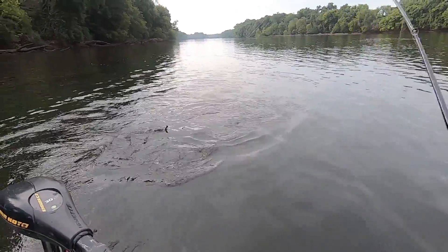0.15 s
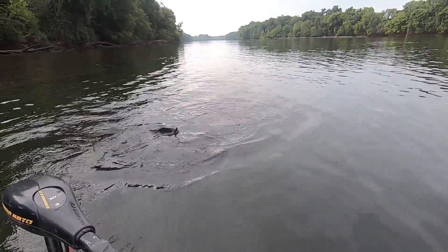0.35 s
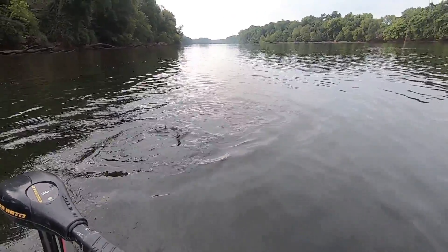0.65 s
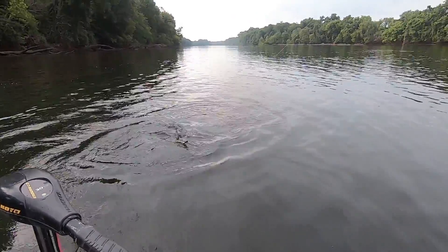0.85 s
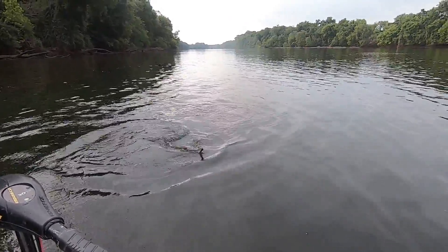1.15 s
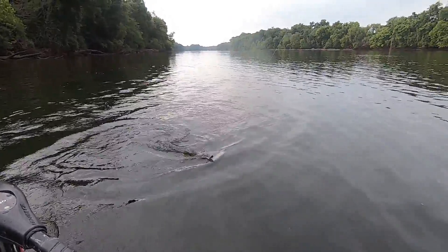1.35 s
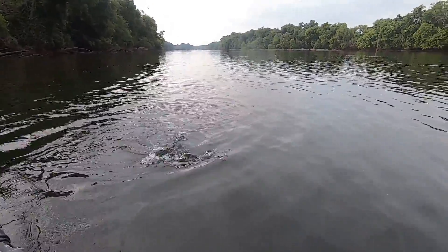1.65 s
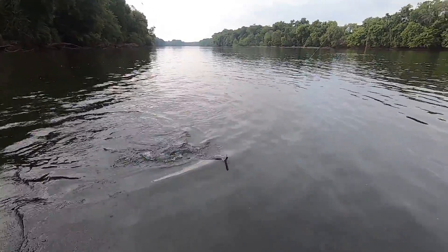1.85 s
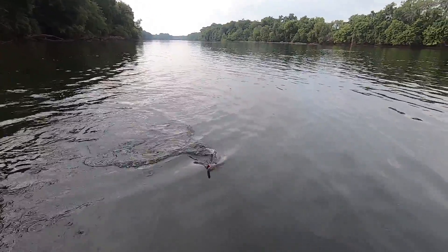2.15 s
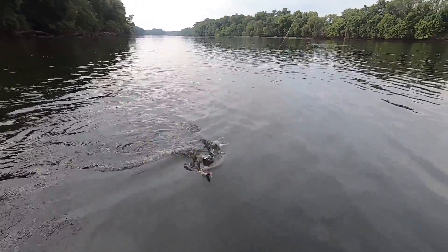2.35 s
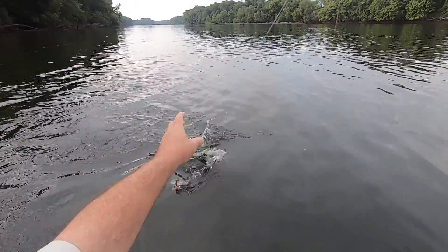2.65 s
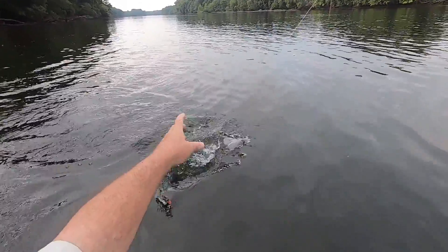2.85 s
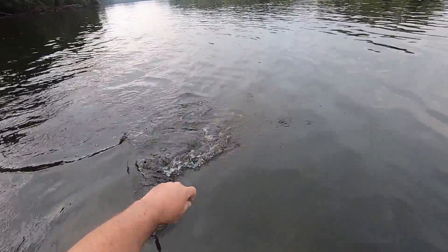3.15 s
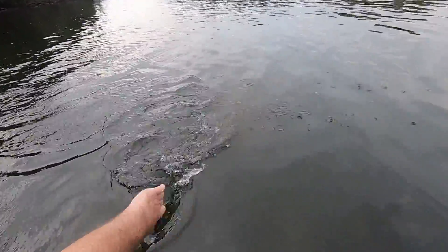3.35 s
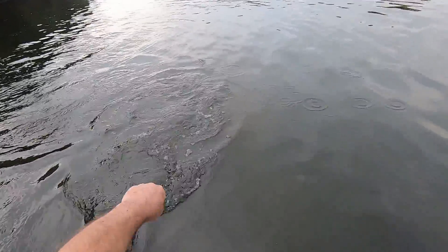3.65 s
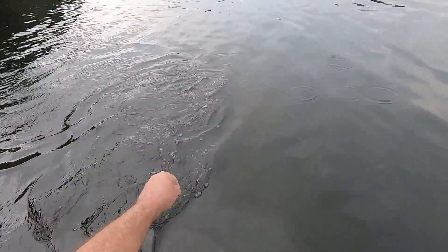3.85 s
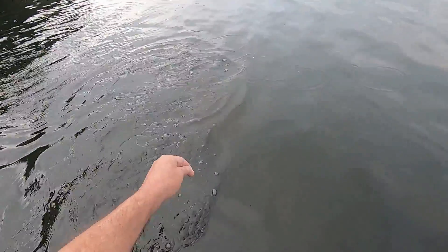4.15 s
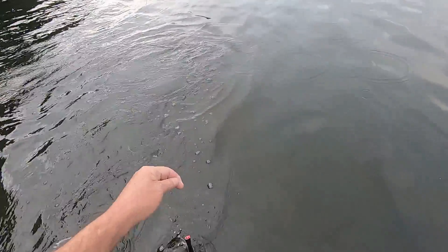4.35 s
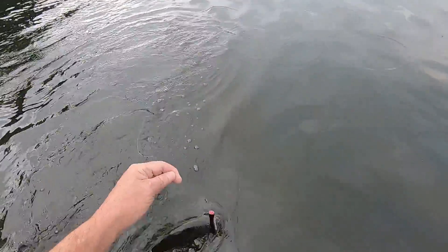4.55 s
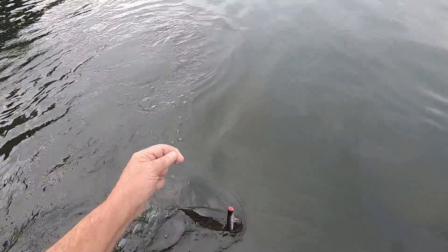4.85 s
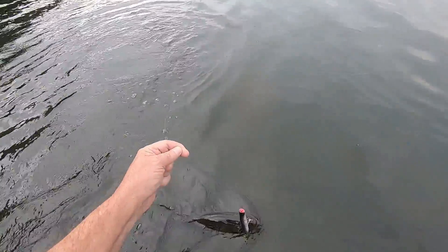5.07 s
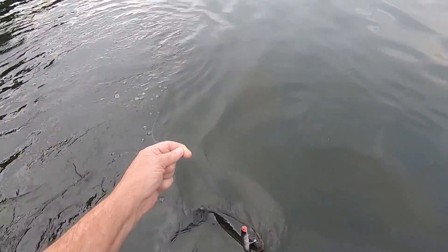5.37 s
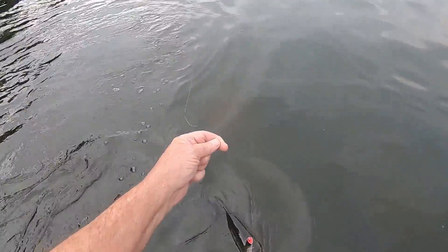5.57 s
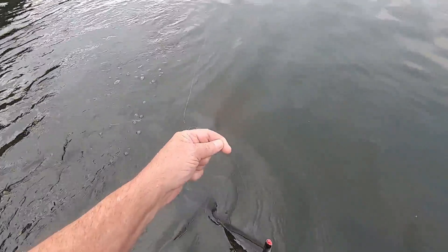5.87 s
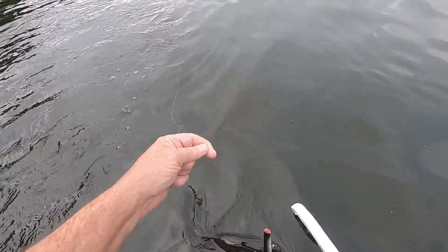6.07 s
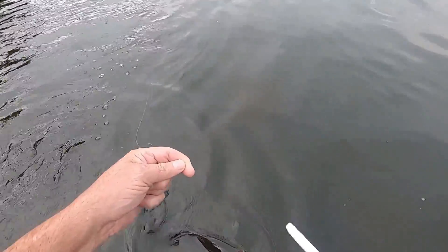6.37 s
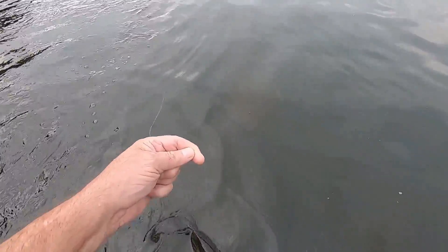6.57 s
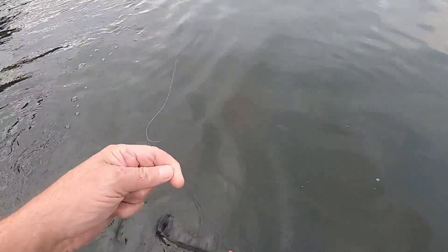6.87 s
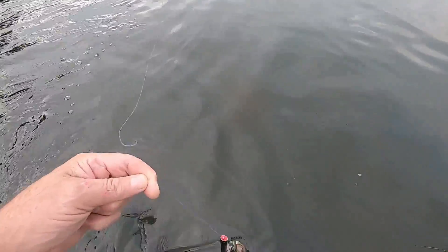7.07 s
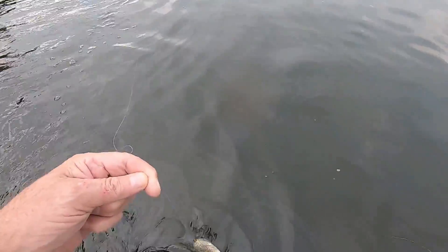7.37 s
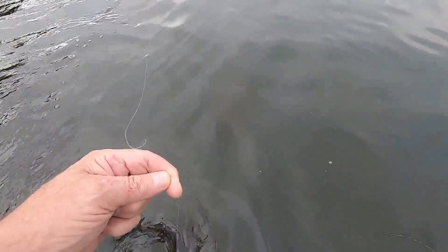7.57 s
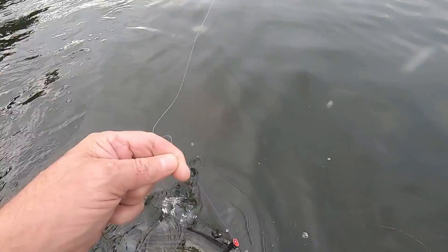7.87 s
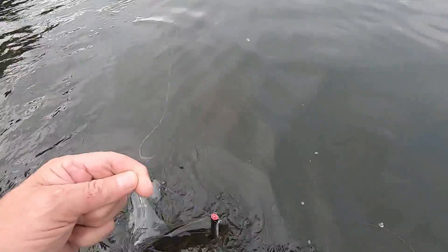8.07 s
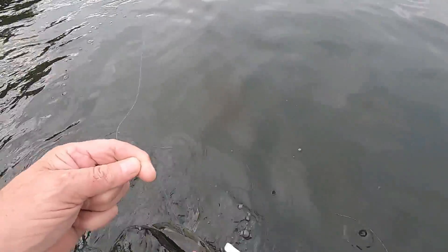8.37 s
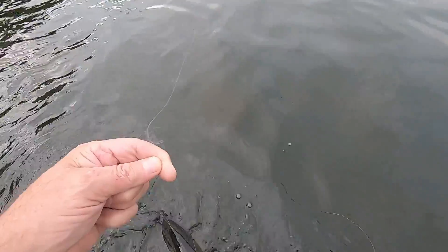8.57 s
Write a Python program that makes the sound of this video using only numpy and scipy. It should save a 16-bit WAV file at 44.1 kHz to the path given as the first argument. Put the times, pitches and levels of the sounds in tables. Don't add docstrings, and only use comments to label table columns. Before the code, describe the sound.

Over a steady low hum and soft roar, river water ticks, churns and plops; tackle bangs a plastic hull before one last sharp splash.

```python
import sys
import numpy as np
from scipy import signal
from scipy.fft import rfft, irfft, next_fast_len
from scipy.io import wavfile
from scipy.ndimage import uniform_filter1d

SR = 44100
rng = np.random.default_rng(int(sys.argv[2]) if len(sys.argv) > 2 else 0)


def digitize_waveform(pressure):
    field = np.atleast_2d(pressure).T
    bounded = np.clip(field, -1, 1)
    quanta = np.round(bounded * 32767).astype(np.int16)
    wavfile.write(sys.argv[1], SR, quanta)


def gain_from_db(level_db):
    decades = np.asarray(level_db, float) / 20
    return 10 ** decades


N = 384552

# time in seconds, carry of the hum in dB, roar in dB.
AIR = [(0, -21, -45.5), (0.799, -27, -45), (1.6, -25.5, -45.5), (2.4, -26.5, -45), (3.2, -24, -45),
       (3.901, -26, -45.5), (4.15, -36, -46.5), (4.5, -25, -45.5), (5.4, -23, -45), (5.8, -27, -49),
       (6.4, -25, -46.5), (6.8, -20, -46), (7.3, -25, -47.5), (7.9, -25.5, -47), (8.72, -23.5, -46.5)]
# frequency in Hz, density in dB per Hz.
ROAR_SPECTRUM = [(22, -28), (30, -6), (45, -4), (100, 2), (150, -4), (215, -5.5), (300, -13.5), (400, -15),
                 (700, -24.5), (1500, -30), (2600, -37), (4200, -49), (7000, -56), (9600, -62.5),
                 (11500, -83)]
# frequency in Hz, left-right likeness.
FAR_LIKENESS = [(40, 0.96), (120, 0.992), (260, 1.3), (530, 0.7), (1100, -0.11), (2290, 0.35), (4740, 0.08),
                (9820, -2.5)]
# frequency in Hz, left over right in dB.
PORT_BALANCE = [(60, 0), (110, -0.5), (190, -0.5), (330, -0.5), (580, -3), (1020, -7), (1800, -6.5),
                (3160, -4.5), (5570, -1), (9820, 0.5)]
# frequency in Hz, rms level in dB.
HUM_TONES = [(37.26, -34.2), (74.52, -33.8), (79.18, -43.9), (90.09, -30.3), (95.89, -29.3),
             (114.02, -43.8), (143.1, -43.1), (149.0, -45.0)]
# frequency in Hz, rms level in dB, waver in Hz, fade in dB per second.
WHINES = [(214.1, -43, 6, 0), (243.3, -47.5, 0.938, 0), (356, -49.5, 1.99, 0), (466.7, -49, 0.79, 0.33),
          (820.4, -55.5, 2.84, 0.5), (1702, -64.5, 12, 0)]
# time in seconds, frequency in Hz, level in dB.
BIRD_CALL = [
    (6.688, 2690, -62),
    (6.716, 2610, -53),
    (6.746, 2340, -53),
    (6.77, 2160, -63),
]
# frequency in Hz, level in dB, 60 dB decay time in seconds.
HULL_MODES = [(143, -14.5, 0.07), (204.4, 1, 0.093), (291, -4.5, 0.086), (388, -4, 0.063),
              (553, -4.5, 0.019), (990, -20, .03)]
# start in seconds, peak in dB, crack above the blow in dB,
# ping of the struck panel in Hz, ping above the blow in dB.
BLOWS = [
    (2.255, -20, -12, 817, -12),
    (5.387, -9.5, -18.5, 403, -9),
    (5.515, -12.5, -17.5, 486, -12),
    (5.531, -9, -14.5, 990, -12.5),
    (5.583, -7.5, -9.5, 770, -5),
    (5.591, -6.5, -10.5, 800, -3),
    (5.604, -18.5, -22, 514, -4),
    (6.002, -34.5, -31, 546, 4.5),
    (6.448, -27, -1, 1140, -3.5),
]
# time in seconds, level in dB, rasp above it in dB.
DRAG = [
    (5.32, -38, -25),
    (5.37, -32, -25),
    (5.41, -37, -15),
    (5.47, -28, -14.5),
    (5.52, -23, -9),
    (5.57, -27.5, -12.5),
    (5.62, -24, -18),
    (5.66, -34.5, -15),
    (5.7, -43, -22),
]
# frequency in Hz, level in dB.
SCRAPE_SPECTRUM = [(200, -0.5), (380, 0.5), (650, -2), (990, 8), (1400, -4)]
# frequency in Hz, level in dB.
CRACK_SPECTRUM = [(500, -10), (1200, 4.5), (2500, 1.5), (4500, -10.5), (8000, -14.5), (10500, -21),
                  (15500, -42.5)]
# start in seconds, peak in dB, frequency in Hz.
RATTLE = [(5.1085, -43.5, 8100), (5.3885, -26.5, 8300), (5.527, -37, 5300), (5.5828, -25, 9350),
          (5.592, -24.5, 8150), (6.0008, -41.5, 7600), (6.149, -34.5, 5740), (6.1903, -45, 5800),
          (6.226, -43.5, 5600), (6.404, -48, 4670), (6.4485, -29, 7650), (6.4495, -27.5, 5330),
          (6.097, -54, 5300), (6.183, -48, 5700), (6.201, -48, 5800), (5.377, -39, 9000),
          (6.003, -43, 9800), (5.256, -50, 7900), (6.6556, -47, 7700)]
# start in seconds, peak in dB, frequency in Hz.
TAPS = [
    (5.5125, -33.5, 2520),
    (5.5825, -32, 2600),
    (5.5916, -20, 2460),
    (6.1483, -32, 2600),
    (6.322, -34.5, 3100),
    (6.4499, -23.5, 3580),
]
# time in seconds, level in dB.
LAPPING = [(0, -67.5), (1.0, -59.5), (1.5, -65.5), (3.8, -67.5), (5.1, -68.5), (7.4, -76.5), (8.1, -65),
           (8.72, -74)]
# crest in seconds, strength in dB, spray above splash in dB,
# time to settle by 20 dB in seconds.
LUNGES = [(0, -52, -7, 0.06), (.13, -66.5, 4.5, 0.2), (.52, -69, 5.5, 0.44), (1.59, -56, -5.5, 0),
          (1.69, -44, -13, 0.25), (1.84, -47.5, -8, 0.07), (1.95, -58, -3, 0.5), (2.4, -53, -2, .9),
          (2.5, -43.5, -6, 0.16), (2.68, -43, -10, 0.31), (2.88, -41, -7.5, 0.36), (2.97, -46.5, -12, 0.1),
          (3.18, -46, -9.5, 0.32), (3.42, -51, -7, 0.48), (3.55, -53, -6.5, 0.5), (3.65, -54, -15, 0),
          (4.375, -49, -4, 0.4), (4.519, -41, -7, 0.15), (4.68, -58, -5, 0.44), (7.48, -54, -3, .08),
          (7.68, -45.5, -1, 0.31), (7.74, -38.5, -4, 0.3), (7.812, -33, -4.5, 0.1238),
          (7.91, -48, 3.5, 0.27), (8.0, -47.5, -2.5, 0.37), (8.18, -57.5, 3, 0.5), (8.3, -60, -6, 0.4)]
# frequency in Hz, level in dB.
FIZZ_SPECTRUM = [(3000, -13), (5200, -8), (7000, 4), (9300, 1.5), (10600, -3), (12500, -8.5), (15500, -24)]
# frequency in Hz, level in dB.
SLAP_SPECTRUM = [(300, -8), (700, -1.5), (1500, 4.5), (3000, -13.5), (6000, -24), (11000, -34)]
# frequency in Hz, level in dB.
DAB_SPECTRUM = [(500, -10), (1200, 0.5), (2500, 0.5), (4500, -0.5), (8000, -18.5), (10500, -26),
                (15500, -46.5)]
# frequency in Hz, level in dB.
FILM_SPECTRUM = [(1800, -20), (3000, -2.5), (6000, -1), (9800, -1), (12500, -11), (15500, -23)]
# start in seconds, peak in dB, frequency in Hz.
SNAPS = [(0.1175, -45, 7930), (0.1456, -49.5, 7950), (0.2055, -45, 4990), (0.5082, -39.5, 7100),
         (0.5891, -44, 8100), (0.6624, -42.5, 7780), (0.8959, -50, 6720), (1.2387, -42.5, 4710),
         (1.5467, -42, 7380), (1.5742, -37, 6700), (1.6307, -44, 5550), (1.731, -41.5, 5580),
         (1.8143, -39.5, 4600), (1.931, -37, 5090), (1.9495, -43, 6760), (2.0314, -41, 7700),
         (2.0777, -41, 7000), (2.1141, -37.5, 7060), (2.1845, -43, 6920), (2.1994, -51, 4560),
         (2.371, -34, 7150), (2.4249, -33, 6960), (2.4972, -31, 5720), (2.556, -38, 5430),
         (2.6917, -38, 6440), (2.83, -35, 4770), (2.8599, -37, 5020), (2.8874, -38, 4500),
         (2.9238, -37.5, 5100), (2.973, -38, 4640), (3.0091, -42, 4520), (3.046, -40, 5510),
         (3.0709, -38, 4760), (3.115, -45, 4980), (3.149, -37, 7260), (3.1842, -36, 5030),
         (3.2266, -41, 4740), (3.3707, -45, 5080), (3.4181, -38.5, 5100), (3.485, -40, 6700),
         (3.5556, -34, 4700), (3.637, -46.5, 5570), (4.2946, -51, 5020), (4.4463, -35.5, 6640),
         (4.4675, -37, 6540), (4.4774, -39.5, 7010), (4.4894, -32.5, 7030), (4.5404, -39, 4900),
         (4.5777, -37, 7970), (4.5994, -39.5, 8180), (4.6503, -42, 4570), (7.5874, -37.5, 4500),
         (7.656, -28.5, 6760), (7.6738, -26, 9350), (7.7358, -22, 4860), (7.8454, -23.5, 8080),
         (7.8544, -32.5, 4570), (8.0044, -26.5, 8200), (8.049, -30.5, 9400), (8.1035, -31, 5250),
         (0.0074, -42, 7980), (0.0164, -43.5, 4760), (0.4264, -50, 4500), (0.4894, -42, 7300),
          (0.5374, -43.5, 6910), (0.6364, -53, 4920), (0.9423, -45, 5000), (2.9004, -40, 4500),
          (2.941, -40, 4570), (3.2464, -43.5, 6980), (4.0916, -45, 4600), (4.7794, -49, 5210),
          (4.8553, -42.5, 7570), (7.7644, -29, 7330), (7.769, -35, 7480), (8.2342, -35, 5680)]
# start in seconds, peak in
# dB, frequency in Hz.
TICKS = [(0.473, -35, 6600), (0.5316, -34, 7550), (0.6213, -37.5, 7800), (1.59, -35, 6650),
         (1.605, -32, 6900), (1.658, -35, 6700), (1.7634, -35.5, 6500), (2.039, -40.5, 7460),
         (2.2582, -26, 8220), (2.3516, -36.5, 7200), (2.387, -30.5, 7030), (2.4018, -28, 6880),
         (2.4436, -32, 7540), (2.6316, -29, 7440), (2.7462, -28, 7740), (2.7868, -34, 6800),
         (3.5317, -33.5, 8200), (3.577, -35, 5300),
         (4.342, -29.5, 8930), (4.353, -25.5, 9100), (4.368, -14.5, 6400), (4.3939, -22, 8900),
         (4.421, -25, 8700), (4.4558, -32.5, 6700), (4.511, -28.5, 6270), (4.578, -34, 8100),
         (4.7333, -35, 7560), (4.8067, -38.5, 7740), (7.472, -41.5, 9100), (7.5117, -33, 7570),
         (7.5762, -29.5, 8100), (7.619, -23, 7500), (7.6406, -30.5, 6760), (7.695, -24, 7300),
         (7.7262, -18, 6160), (7.7566, -23, 7420), (7.8036, -19, 8300), (7.812, -19.5, 6330),
         (7.8783, -24.5, 8890), (7.9275, -23, 7300), (7.992, -27, 6190), (8.0225, -24.5, 7900),
         (8.0633, -27, 9200), (8.153, -29.5, 8400), (8.197, -35.5, 7970)]
# start in seconds, peak in dB, frequency
# in Hz.
MORE_DROPS = [(1.238, -39.5, 4330), (1.535, -42, 3700), (1.732, -38, 3000), (1.815, -36, 3000),
              (2.484, -33.5, 2980), (2.578, -35.5, 2850), (2.645, -29.5, 3240), (2.695, -33, 2900),
              (2.726, -31.5, 3530), (2.848, -29, 2300), (2.994, -34, 2360), (3.011, -31, 2400),
              (3.057, -29.5, 2930), (3.139, -33, 2400), (3.226, -33, 2660), (3.371, -33.5, 2760),
              (3.42, -32.5, 2650), (3.637, -39, 2530), (4.341, -31.5, 3320), (4.52, -26, 1880),
              (4.659, -38.5, 2900), (4.663, -41, 4500), (7.684, -30, 2540), (7.737, -23, 4830),
              (7.813, -16, 3480), (7.832, -24, 4400), (7.896, -29, 3170), (8.072, -34, 3600), (8.083, -38, 2600),
              (8.14, -33.5, 1950), (8.181, -44, 2200), (8.224, -32, 2620), (8.229, -30, 3330), (8.29, -37, 3200),
              (8.3, -40, 3100)]
# start in seconds, peak in dB, frequency in Hz.
DROPS = [(1.262, -27, 3000), (1.66, -32.5, 3050), (1.7494, -31, 2640), (1.9098, -33, 3040),
         (2.5397, -31, 2630), (4.296, -36.5, 3680), (2.773, -34, 2480), (2.886, -26, 3050),
         (2.9302, -27, 2600), (2.9558, -31, 3120), (3.147, -28.5, 2840), (3.1742, -26, 3100),
         (3.2089, -28.5, 2710), (3.2853, -30, 2820), (4.3804, -21.5, 4000), (4.4283, -27, 3400),
         (4.515, -26.5, 3120), (4.5848, -30, 3270), (7.6792, -28, 2740), (7.7116, -23.5, 3420),
         (7.7313, -22.5, 2900), (7.7613, -24, 3500), (7.7992, -14.5, 3430), (7.5873, -35, 3500),
         (7.918, -28, 2400), (7.9898, -24, 4100), (8.1248, -28, 3680), (8.152, -28.5, 2800),
         (8.1723, -29, 3240), (8.2747, -30, 3140)]
# start in seconds, peak in dB,
# frequency in Hz.
BLIPS = [(1.661, -38, 664), (1.699, -33.5, 1100), (2.424, -33.5, 960), (2.52, -29.5, 1240),
         (2.648, -30, 605), (2.7, -31, 1200), (2.83, -25.5, 1300), (2.95, -32, 1390), (3.453, -33.5, 1310),
         (4.483, -30, 1290), (4.485, -33.5, 800), (4.538, -30, 1170), (4.596, -31.5, 690),
         (4.609, -34, 1000), (7.64, -38, 1400), (7.699, -31, 1200), (7.957, -30.5, 1140),
         (7.997, -29.5, 840), (8.054, -30, 1595), (8.176, -38, 1250)]
# start in seconds, peak in dB, frequency in Hz.
GULPS = [
    (2.914, -31.5, 596),
    (3.07, -32, 705),
    (3.42, -37.5, 748),
    (4.568, -32.5, 648),
    (4.724, -37.5, 738),
    (4.758, -36.5, 710),
]
# start in seconds, peak in dB, frequency in Hz, left over right in dB.
PLOPS = [(1.621, -29.5, 953, -1), (1.737, -32, 993, 0), (2.528, -28, 800, -1), (2.56, -32, 840, -2),
         (2.632, -24.5, 587, -6), (2.743, -25, 635, -6), (2.823, -20.5, 720, -2.5), (2.833, -20.5, 553, 2),
         (2.92, -30.5, 710, 3), (3.07, -30, 484, -2), (3.084, -27.5, 1118, 1.5), (4.517, -24.5, 1060, -1),
         (4.527, -24.5, 1160, -3), (4.589, -28.5, 717, 1), (8.58, -35, 1410, -3.5), (7.587, -33, 1120, -6),
         (8.426, -37, 1500, -2), (7.712, -31, 810, -11), (7.734, -31.5, 840, -9), (7.78, -26.5, 1760, -6),
         (7.795, -24.5, 1214, -6), (7.816, -24.5, 1360, -6.5), (7.877, -28, 790, -5.5),
         (7.919, -29, 1710, -8.5), (7.95, -20, 1250, -7), (4.75, -28.5, 1400, 0),
         (8.035, -25.5, 1640, -12.5)]
# delay in seconds, left in dB, right in dB.
ECHOES = [
    (.0028, -12, -13),
    (.0065, -19, -18),
]
# frequency in Hz, left over right in dB.
NEAR_BALANCE = [(3000, 0.5), (5000, 2), (7000, 3), (9000, -2)]
# frequency in Hz, left lead in radians.
PORT_LEAD = [(40, 0), (200, -.1), (560, -.45), (1300, .55), (2200, .2), (4400, .1), (6500, -.6),
             (8100, -1.6), (9700, -1.7)]
# frequency in Hz, level in dB.
CAPSULE = [(9700, 0), (10500, -5.5), (13000, -2.5)]


def evened(x):
    return x / np.sqrt(np.mean(x ** 2) + 1e-20)


def read(points, hz):
    f, value = np.transpose(points)
    return np.interp(np.log(hz + 1), np.log(f + 1), value)


def add(mix, s, sound):
    part = mix[:, round(s * SR):][:, :sound.shape[1]]
    part += sound[:, :part.shape[1]]


def coloured(x, points):
    size = next_fast_len(x.shape[-1] + SR // 20)
    response = gain_from_db(read(points, np.fft.rfftfreq(size, 1 / SR)))
    return irfft(rfft(x, size) * response, size)[..., :x.shape[-1]]


def sides(pan_db):
    return gain_from_db(np.array([[.5], [-.5]]) * pan_db)


def slow(per_s):
    knots = int(N / SR * per_s) + 2
    return np.interp(np.arange(N), np.linspace(0, N, knots), rng.standard_normal(knots)) * np.sqrt(1.5)


def roar():
    frames, hz = N // 512 + 5, np.fft.rfftfreq(2048, 1 / SR)
    a, b, c, d, patches = rng.standard_normal((frames, 1025, 5)).T
    patches = evened(uniform_filter1d(uniform_filter1d(patches, 14, 0), 8, 1))
    s, _, roar_db = np.transpose(AIR)
    drift_db = np.interp(np.arange(frames) * 512 / SR, s, roar_db - roar_db.mean())
    follows = np.interp(hz, [150, 600, 5000], [.2, .9, 1.1])[:, None]
    same = np.clip(read(FAR_LIKENESS, hz), -1, 1)[:, None]
    left = a + 1j * b
    right = same * left + np.sqrt(1 - same ** 2) * (c + 1j * d)
    lean = gain_from_db(read(PORT_BALANCE, hz) / 2)[:, None]
    z = np.array([left * lean, right / lean])
    z *= gain_from_db(read(ROAR_SPECTRUM, hz)[:, None] + 0.98 * patches + follows * drift_db)
    return gain_from_db(-27.5) * evened(signal.istft(z, nperseg=2048, noverlap=1536)[1][:, :N])


def machinery():
    t = np.arange(N) / SR
    s, carry_db, roar_db = np.transpose(AIR)
    crest_s = .4628
    tones = sum(np.sqrt(2) * gain_from_db(db) * np.cos(2 * np.pi * hz * (t - crest_s)) for hz, db in HUM_TONES)
    tones *= gain_from_db(0.68 * np.interp(t, s, carry_db - carry_db.mean()))
    whines = 0
    for hz, db, waver_hz, fade_db in WHINES:
        level = gain_from_db(db - fade_db * t + 2 + 1.4 * slow(3.0))
        phase = 2 * np.pi * np.cumsum(hz + waver_hz * slow(4.0)) / SR
        whines = whines + level * np.sin(phase) * sides(read(PORT_BALANCE, hz))
    return tones + whines * gain_from_db(2.34 * np.interp(t, s, roar_db - roar_db.mean()))


def bird():
    s, hz, db = np.transpose(BIRD_CALL)
    t = np.arange(s[0], s[-1], 1 / SR)
    phase = 2 * np.pi * np.cumsum(np.interp(t, s, hz)) / SR
    call = np.sqrt(2) * gain_from_db(np.interp(t, s, db)) * np.sin(phase)
    out = np.zeros((2, N))
    add(out, s[0], call * sides(-9.0))
    return out


def bubble(hz, cycles, rise, lag_s=0):
    t = np.arange(int(6 * SR * cycles / hz) + 16) / SR
    t = np.maximum(t - abs(lag_s) + np.array([[lag_s], [-lag_s]]), 0)
    turns = hz * t
    swell = (turns / cycles) ** 1.5 * np.exp(-2 * turns / cycles)
    return np.sin(2 * np.pi * turns * (1 + rise * turns / cycles)) * swell / swell.max()


def blows():
    out, t = np.zeros((2, N)), np.arange(6000) / SR
    pan_db = -7.5
    for s, db, crack_db, ping_hz, ping_db in BLOWS:
        ring = 0
        for hz, mode_db, t60 in HULL_MODES:
            decay = gain_from_db(mode_db - 60 * t / t60 + 1.7 * rng.normal())
            ring = ring + decay * np.sin(2 * np.pi * (hz * t + rng.random()))
        ring *= 1 - np.exp(-t / 0.0037)
        add(out, s, gain_from_db(db + ping_db) * bubble(ping_hz, 1.1, 0) * sides(pan_db))
        noise = rng.standard_normal(6000) + .5 * rng.standard_normal((2, 6000))
        crack = evened(coloured(noise, CRACK_SPECTRUM))
        crack *= (np.exp(-t / 0.0021) + 0.2 * np.exp(-t / 0.012)) * (1 - np.exp(-t / 0.0014))
        add(out, s, gain_from_db(db) * (0.47 * ring * sides(0.24 * pan_db) + gain_from_db(crack_db) * crack * sides(pan_db)))
    return out


def drag():
    s, db, rasp_db = np.transpose(DRAG)
    t = np.arange(s[0], s[-1], 1 / SR)
    slips = rng.standard_normal(len(t)) * gain_from_db(2.5 * slow(60)[:len(t)])
    u = t[:4000] - s[0]
    body = sum(gain_from_db(d - 120 * u / t60) * np.sin(2 * np.pi * hz * u) for hz, d, t60 in HULL_MODES)
    rumble = evened(coloured(signal.fftconvolve(slips, body)[:len(t)], SCRAPE_SPECTRUM)) * sides(-1.5)
    rasp = evened(coloured(slips, SLAP_SPECTRUM)) + gain_from_db(-17) * evened(coloured(slips, FIZZ_SPECTRUM))
    rasp = rasp * gain_from_db(np.interp(t, s, rasp_db) - 8.0) * sides(-5.5)
    out = np.zeros((2, N))
    add(out, s[0], gain_from_db(np.interp(t, s, db) - 0.5) * (rumble + rasp) * signal.windows.tukey(len(t), .15))
    return out


def motion():
    t = np.arange(0, N + 256, 256) / SR
    s, db, spray_db, settle_s = np.transpose(LUNGES)[:, :, None]
    since = np.where(t < s, (s - t) / 0.38, t - s)
    lunges = gain_from_db(2 * (db - 20 * since / settle_s))
    lapping = gain_from_db(2 * np.interp(t, *np.transpose(LAPPING)))
    splash_db = 10 * np.log10(lunges.sum(0) + lapping)
    fine_db = 10 * np.log10((lunges * gain_from_db(2 * spray_db)).sum(0) + lapping * gain_from_db(2 * -7.5))
    gurgle_db = -41.5 + 0.68 * np.minimum(splash_db + 46.5, 0)
    return [np.interp(np.arange(N) / SR, t, level_db) for level_db in (splash_db, fine_db, gurgle_db)]


def swarm(lo_hz, hi_hz, per_s, cycles, spread_db, spread_s, count=12):
    train = gain_from_db(spread_db * np.minimum(rng.exponential(1, N), 4)) * (rng.random(N) < per_s / SR)
    kind = rng.integers(0, count, N)
    total = 0
    for k, hz in enumerate(np.geomspace(lo_hz, hi_hz, count)):
        ring = bubble(hz, cycles * rng.uniform(0.55, 1.83), 0.0488, spread_s * rng.normal())
        total = total + signal.oaconvolve((train * (kind == k))[None], ring, axes=1)[:, :N]
    return evened(total)


def churn():
    level = gain_from_db(motion() + 2.8 * slow(60))
    splash = gain_from_db(-2.0) * swarm(2100, 5400, 3600, 3.8, 4.2, 1.5e-5) * sides(-1.7)
    spray = coloured(swarm(5140, 14500, 4500, 2.5, 4.1, 3e-5), FIZZ_SPECTRUM) * sides(-2.5)
    gurgle = gain_from_db(-2.5) * swarm(620.0, 2503, 850, 4.2, 3.7, 4e-5) * sides(-2.5)
    return level[0] * splash + level[1] * spray + level[2] * gurgle


def crackle():
    return gain_from_db(motion()[0] - 9.5) * swarm(1200, 7000, 350, 1.1, 5.2, 2e-5) * sides(-2)


def struck(events, cycles, rise, spread_s, puff_db, puff_s, colour):
    out, t = np.zeros((2, N)), np.arange(1024) / SR
    for s, db, hz, *pan_db in events:
        u, v, w = rng.random(3)
        side = sides(pan_db[0] if pan_db else -1.2 + 3.8 * (w - .5))
        ring = bubble(hz, cycles * (.8 + .4 * u), rise, spread_s * (2 * v - 1))
        noise = rng.standard_normal(1024) + 0.43 * rng.standard_normal((2, 1024))
        puff = evened(coloured(noise, colour)) * (t / puff_s * np.exp(1 - t / puff_s)) ** 1.2
        add(out, s, gain_from_db(db - 2.0) * side * ring)
        add(out, s, gain_from_db(db + puff_db) * side * puff)
    return out


def tackle_clicks():
    rattle = struck(RATTLE, 5.4, 0.005, 3e-5, -11.5, 0.0016, FILM_SPECTRUM)
    return rattle + struck(TAPS, 2.6, 0.011, 1e-5, -14.5, 0.0028, CRACK_SPECTRUM)


def spray_and_film():
    ticks = struck(TICKS, 4.8, 0.0079, 3e-5, -12.0, 0.0015, FIZZ_SPECTRUM)
    return ticks + struck(SNAPS, 2.5, 0.007, 3e-5, -8, 0.00085, FILM_SPECTRUM)


def falling_drops():
    drops = struck(DROPS, 3.5, 0.0077, 1e-5, -13.0, 0.0026, DAB_SPECTRUM)
    return drops + struck(MORE_DROPS, 3.5, 0.01, 1e-5, -12.5, 0.002, DAB_SPECTRUM)


def large_bubbles():
    plops = struck(PLOPS, 3.9, 0.0053, 2e-5, -14.0, 0.0043, SLAP_SPECTRUM)
    blips = struck(BLIPS, 3.8, 0.01, 2e-5, -14.5, 0.0033, SLAP_SPECTRUM)
    return plops + blips + struck(GULPS, 8.0, .28, 2e-5, -18.5, 0.0062, SLAP_SPECTRUM)


def echoed(x):
    taps = np.zeros((2, 700))
    taps[:, 0] = 1
    for s, left_db, right_db in ECHOES:
        add(taps, s, gain_from_db([[left_db], [right_db]]) * rng.standard_normal((2, 8)) / np.sqrt(8))
    return signal.oaconvolve(x, taps, axes=1)[:, :N]


def shaded(x):
    left = coloured(x[0], [(f, db / 2) for f, db in NEAR_BALANCE])
    right = coloured(x[1], [(f, -db / 2) for f, db in NEAR_BALANCE])
    return np.array([left, right])


def ports(x):
    size = next_fast_len(N)
    lead = np.exp(1j * read(PORT_LEAD, np.fft.rfftfreq(size, 1 / SR)))
    return np.array([irfft(rfft(x[0], size) * lead, size)[:N], x[1]])


def scene():
    far = roar() + machinery() + bird()
    hull = blows() + drag()
    churned = shaded(echoed(churn()))
    close = tackle_clicks() + crackle() + spray_and_film() + falling_drops() + large_bubbles()
    return ports(far + hull + churned + shaded(echoed(close)))


def top_cut(x):
    return signal.sosfilt(signal.butter(12, 15400, fs=SR, output="sos"), x)


def record(dry):
    limited = np.tanh(coloured(dry, CAPSULE))
    return top_cut(limited)


dry = scene()
out = record(dry)
digitize_waveform(out)
```